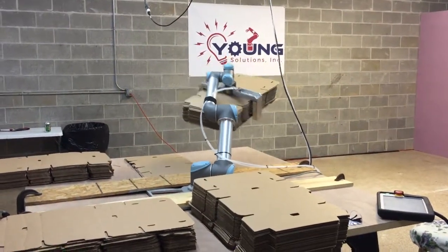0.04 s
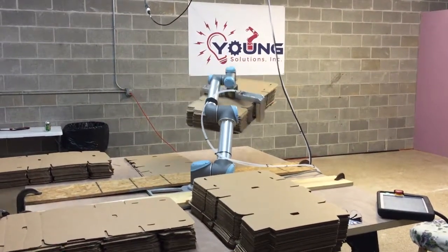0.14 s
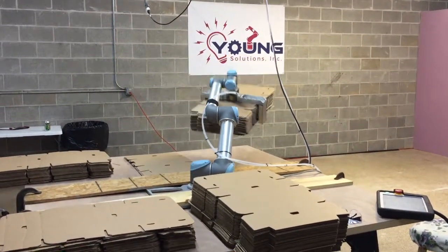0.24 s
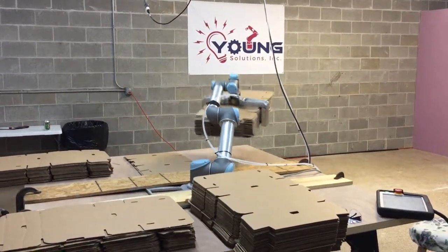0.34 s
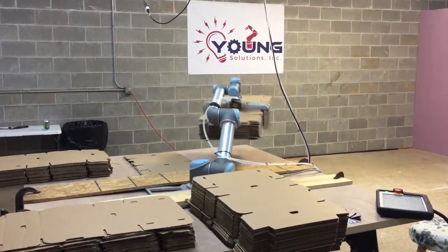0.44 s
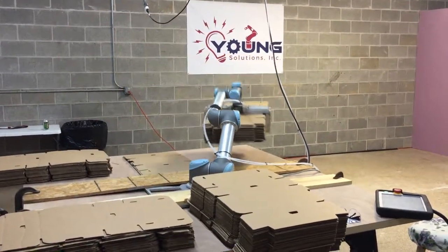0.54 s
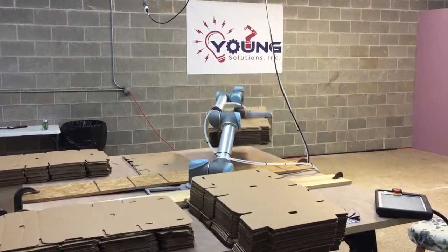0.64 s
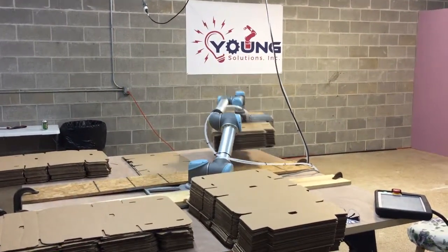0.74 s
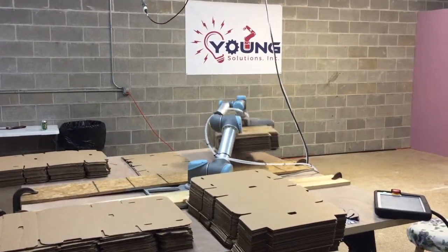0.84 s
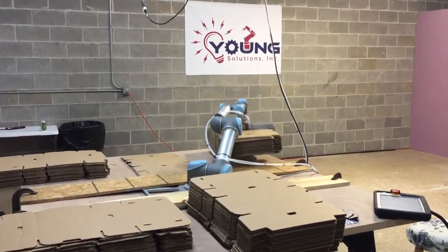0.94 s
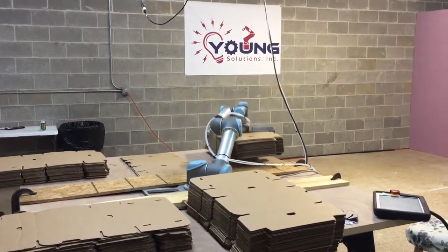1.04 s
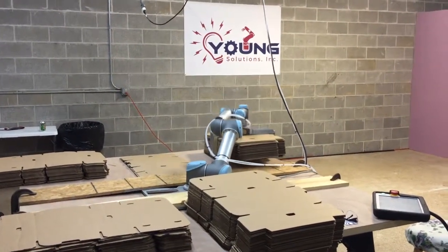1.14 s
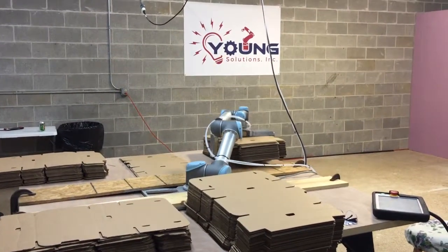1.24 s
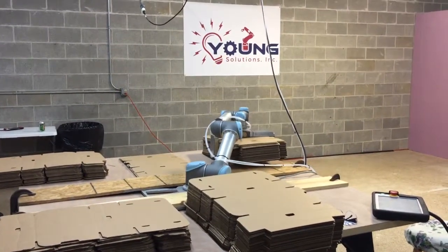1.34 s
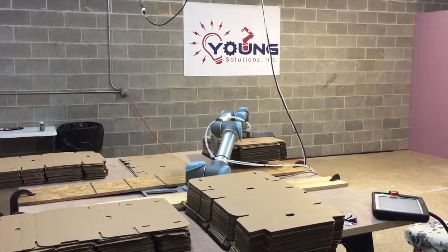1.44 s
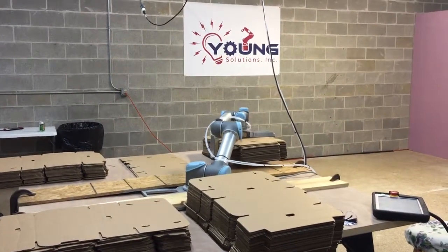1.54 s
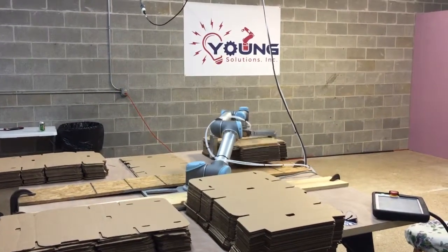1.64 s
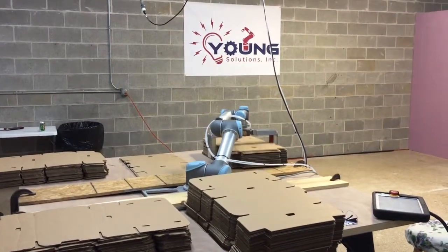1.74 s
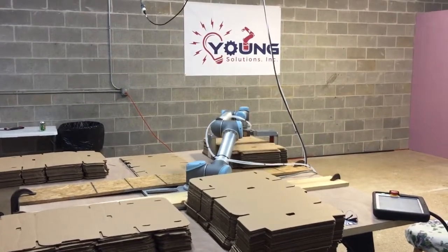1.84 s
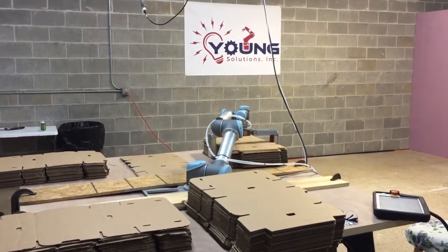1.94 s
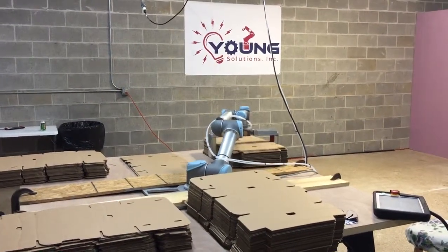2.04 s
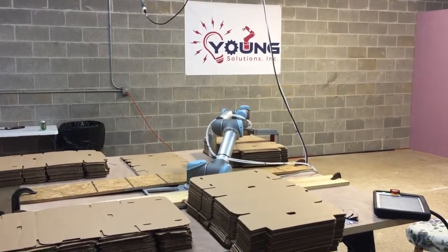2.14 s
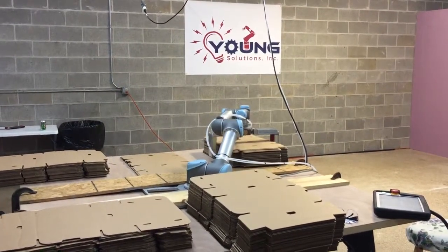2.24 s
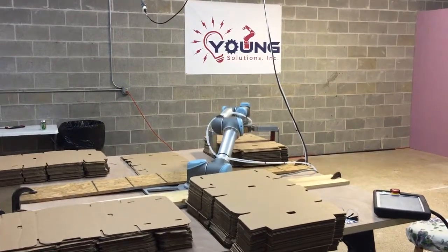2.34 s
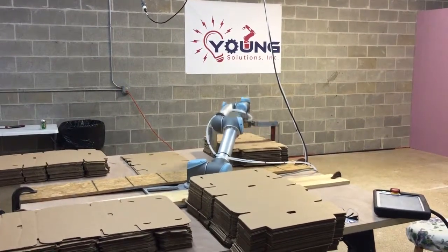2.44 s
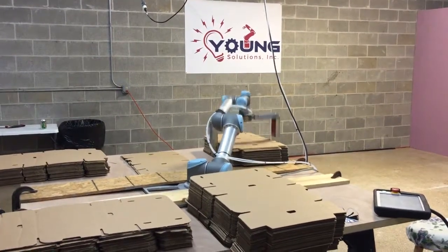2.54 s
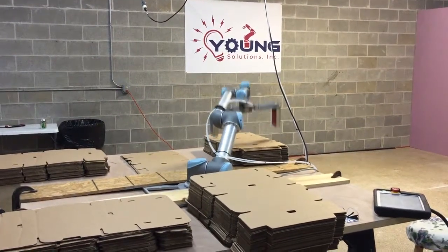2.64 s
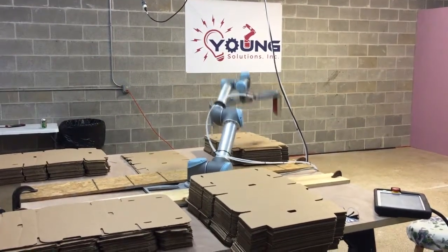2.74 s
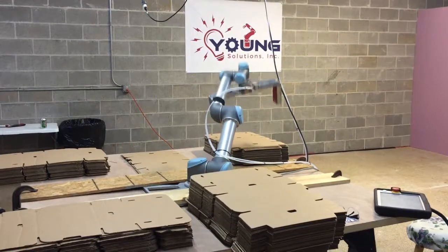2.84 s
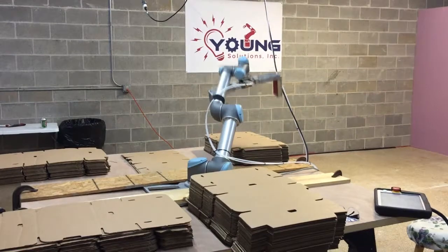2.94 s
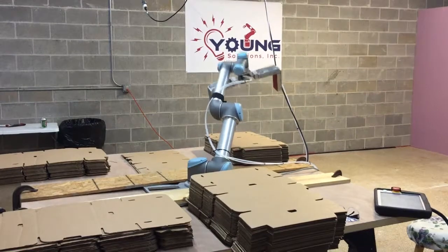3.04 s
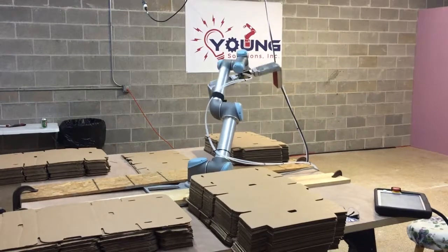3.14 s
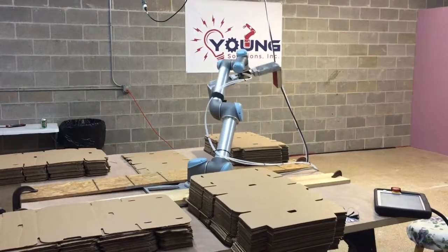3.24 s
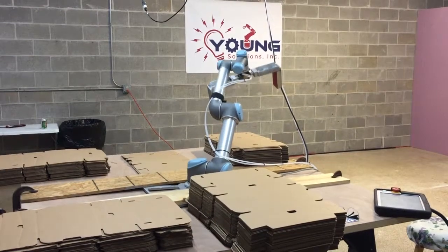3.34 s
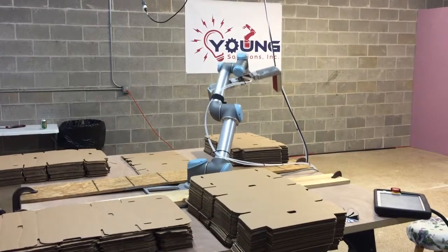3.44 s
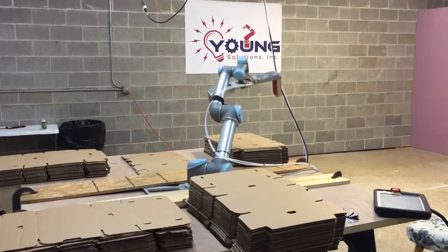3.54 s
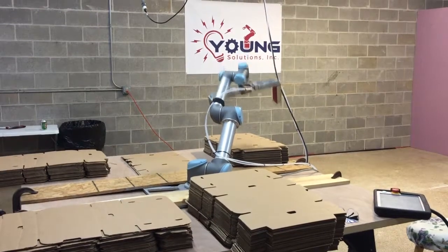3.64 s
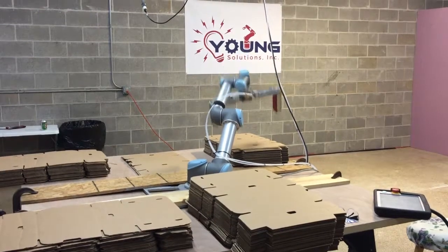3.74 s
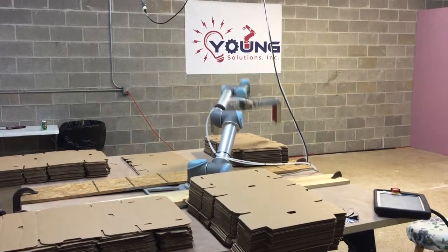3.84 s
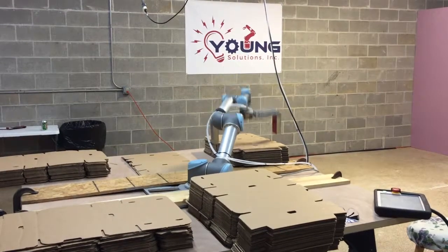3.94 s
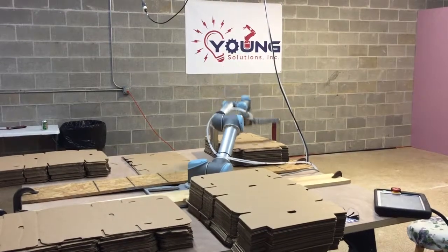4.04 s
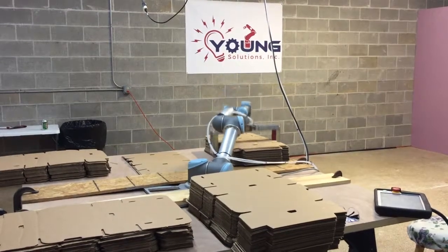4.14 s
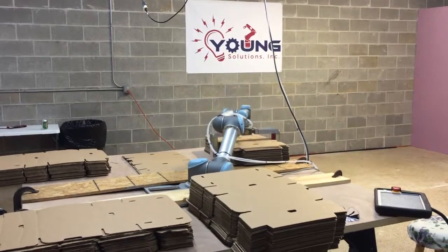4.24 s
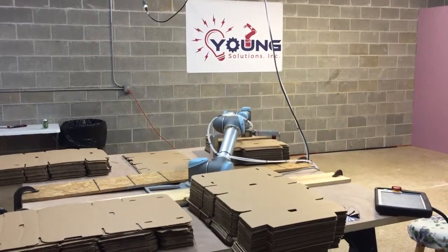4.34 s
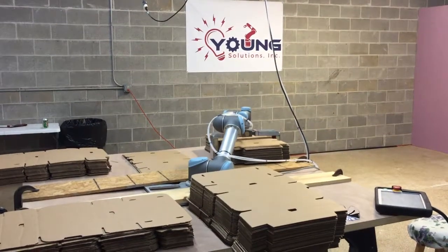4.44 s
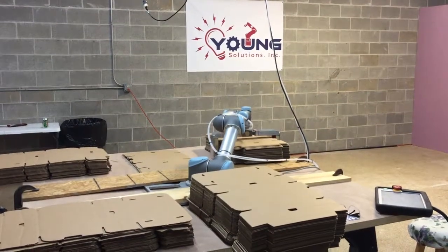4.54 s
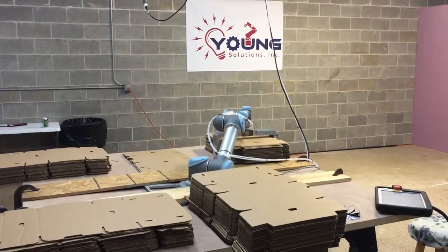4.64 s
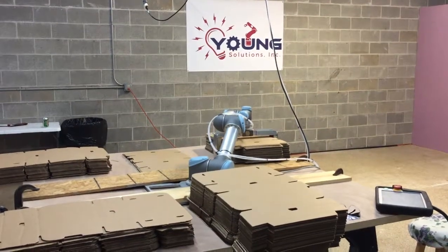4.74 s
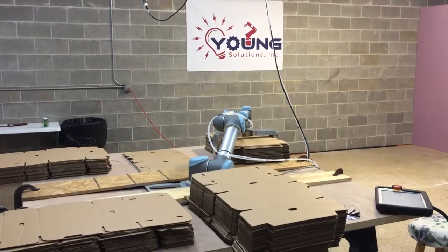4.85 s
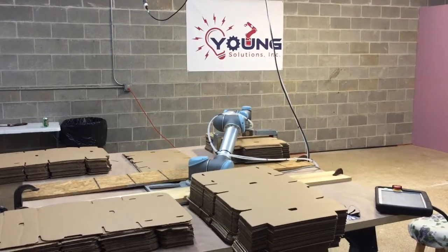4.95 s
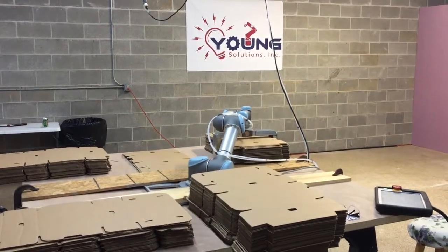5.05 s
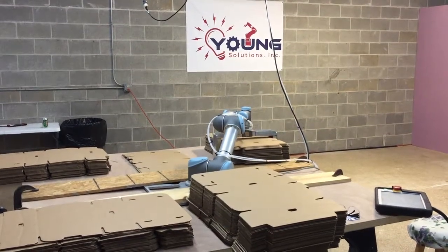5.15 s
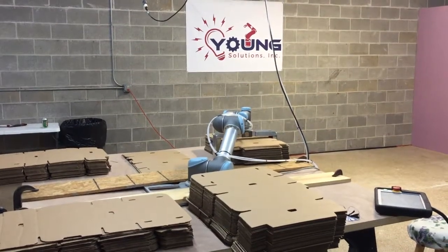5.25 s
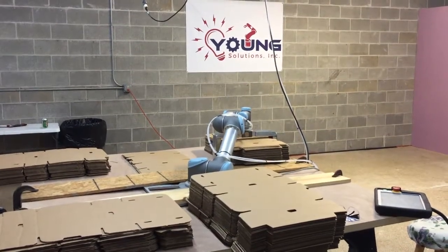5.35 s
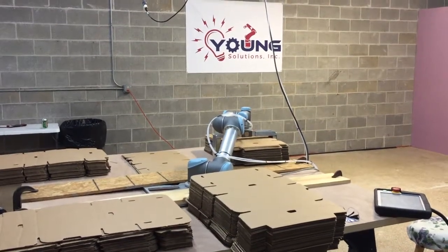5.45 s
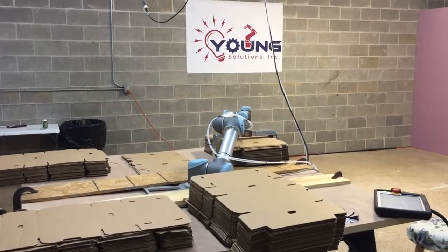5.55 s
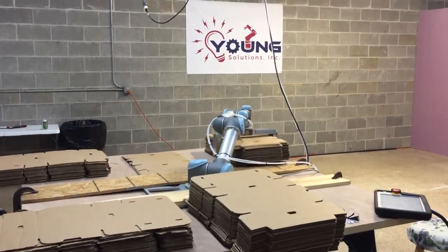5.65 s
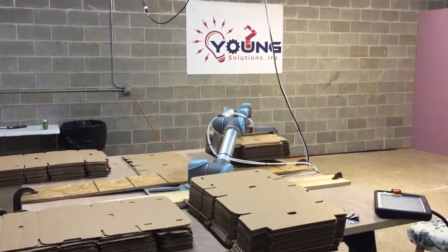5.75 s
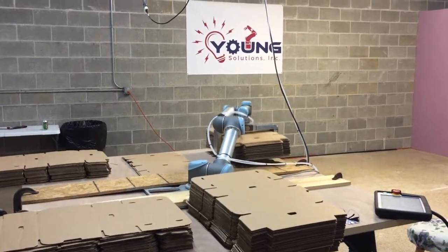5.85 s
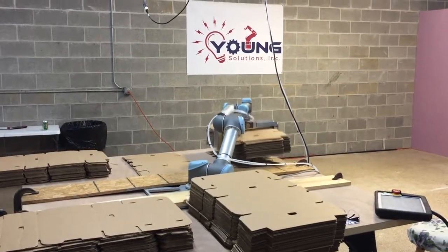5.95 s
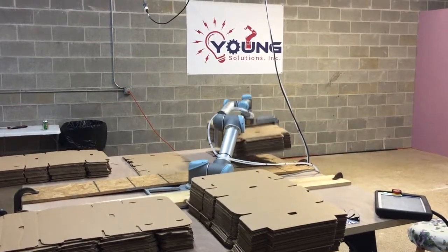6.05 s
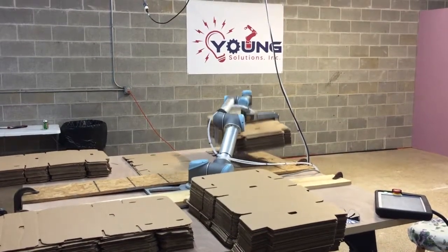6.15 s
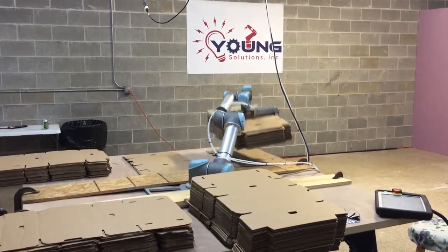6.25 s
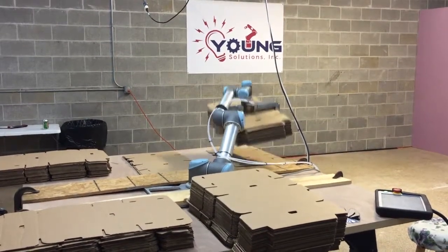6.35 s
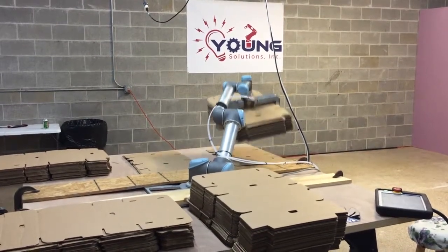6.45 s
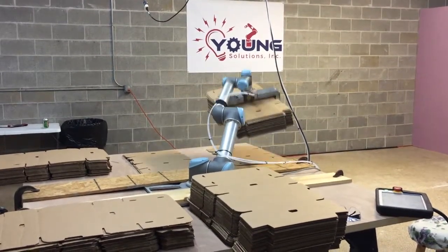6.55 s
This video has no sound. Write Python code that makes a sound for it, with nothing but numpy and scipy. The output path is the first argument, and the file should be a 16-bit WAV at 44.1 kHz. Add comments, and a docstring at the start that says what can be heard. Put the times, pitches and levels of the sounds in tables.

```python
"""One microphone in a block-walled workshop: noise shaped by ducts and fans hums and rushes throughout.
A robot arm's gripper seeps, then vents a pilot and a release blast of noise with a whistle; the hall rings.
The dropped stack of flat cardboard boxes thuds, as enveloped noise. Later the jaw knocks, in noise and
decaying sines, a clamp blast grips the next stack, and it thuds once more under the squeeze.
Last, a thin squeak, a wavering sine, rises and falls as the arm takes the load."""
import sys
import numpy as np
from scipy import signal
from scipy.fft import rfft, irfft, next_fast_len
from scipy.io import wavfile
from scipy.ndimage import map_coordinates

SR = 44100
rng = np.random.default_rng(int(sys.argv[2]) if len(sys.argv) > 2 else 0)


def waveform_to_disk(signal):
    """Save audio, clipped to [-1, 1], as 16-bit WAV at the path in sys.argv[1]."""
    frames = np.transpose(np.atleast_2d(signal))
    scaled = np.clip(frames, -1, 1) * 32767
    samples = np.round(scaled).astype(np.int16)
    wavfile.write(sys.argv[1], SR, samples)


N = 291501  # samples, 6.61 s


def amp(db):
    """Decibels to gain."""
    return 10 ** (np.asarray(db) / 20)


def unit(x):
    """Scale to rms 1."""
    return x / np.sqrt(np.mean(x ** 2) + 1e-20)


def along(points, hz):
    """Read (pitch_hz, value) points at hz, straight lines on a log frequency axis."""
    f, v = np.transpose(points)
    return np.interp(np.log(hz + 1), np.log(f + 1), v)


def since(start_s):
    """Seconds elapsed after start_s, zero before it."""
    return np.maximum(np.arange(N) / SR - start_s, 0)


def wobble(rate):
    """A smooth random curve through rate random knots a second."""
    knots = rng.standard_normal(int(N * rate / SR) + 4)
    return map_coordinates(knots, [np.arange(N) * rate / SR])


def filtered(x, response):
    """Multiply the spectrum of x by a response of frequency."""
    m = next_fast_len(N + SR // 2)  # spare room keeps the end from wrapping onto the start
    hz = np.fft.rfftfreq(m, 1 / SR)
    return irfft(rfft(x, m) * response(hz), m)[:N]


def rush(spectrum, tones=()):
    """Turbulent noise of rms 1: a broad spectrum with narrow resonances, or dips, on it."""
    def response(hz):
        bumps = sum(db / (1 + (2 * (hz - centre) / width) ** 2) for centre, width, db in tones)
        return amp(along(spectrum, hz) + bumps)
    return unit(filtered(rng.standard_normal(N), response))


def strike(start_s, rise_s, t60_s):
    """An envelope that rises in a straight line from start_s, then dies away exponentially."""
    return np.minimum(since(start_s) / rise_s, 1) * amp(-60 * since(start_s + rise_s) / t60_s)


# low rumble in the ducts: pitch_hz, level_db (relative density)
DUCT_RUMBLE = [(20, -49), (30, -34.5), (40, -20.5), (58, -9), (75, -11), (95, -2.5), (120, -6.5),
               (160, -2.5), (200, -6), (250, -6), (370, -16.5), (500, -31), (1100, -63.5)]
# duct resonances on that rumble: pitch_hz, width_hz, boost_db
DUCT_RESONANCES = [(57.6, 7, 4), (91.8, 13, 5.5), (166, 15, 6.5), (245, 7.4, 1.5), (358, 5.1, 4.5)]
# air moving through the room: pitch_hz, level_db (relative density)
AIR_DRAUGHT = [(260, -37), (440, -0.5), (519, -4.5), (639, -1.5), (901, -3.5), (1050, -4), (1430, -4.5),
               (1590, -7), (1840, -8), (2380, -6.5), (3400, -12), (4300, -19.5), (4870, -21.5), (5740, -25),
               (7620, -33.5), (9820, -32.5), (15600, -43.5)]
# fan tones on the draught: pitch_hz, width_hz, boost_db (negative is a dip)
FAN_RESONANCES = [(569, 11, 8.5), (625, 7.3, 8), (1276, 12, 5), (1639, 11, 13), (1850, 6.9, 10.5),
                  (5650, 210, 7.5), (10270, 550, -7.5)]


def ventilation(rumble_db=-38.5, draught_db=-48, flutter_db=0.4):
    """Fan noise drones in the duct resonances under a slightly fluttering rush of air."""
    drone = amp(rumble_db) * rush(DUCT_RUMBLE, DUCT_RESONANCES)
    air = amp(draught_db + flutter_db * wobble(2.2)) * rush(AIR_DRAUGHT, FAN_RESONANCES)
    return drone + air


# hiss of a seal about to open: pitch_hz, level_db (relative density)
SEAL_HISS = [(1500, -24), (5000, -8), (6700, 0), (8500, -9), (11300, -3), (15700, -12)]
SEEP_LEAD_S, SEEP_DB = 0.018, -37


def seep():
    """A thin hiss grows at the seal until the port opens, then fades at twice the blast's decay rate."""
    flow = np.zeros(N)
    for start_s, _, _, emptying_s in PORT_BLASTS:
        flow += strike(start_s - SEEP_LEAD_S, SEEP_LEAD_S, emptying_s) ** 2
    return amp(SEEP_DB) * flow * rush(SEAL_HISS)


# decay of the workshop's tail: pitch_hz, t60_s
HALL_DECAY = [(500, 1.12), (1500, 1.2), (3000, 1.27), (5000, 1.09), (8000, .77), (11000, .52), (15500, .40)]


def diffuse(flow, noise):
    """The hall's tail: energy piles up, swells again as the far wall answers, and drains, treble first."""
    build_s, far_wall_s, smear_s = .006, .38, .12
    hz, t, bands = signal.stft(noise, SR, nperseg=256)
    far_wall = np.exp(-((t - far_wall_s) / smear_s) ** 2)
    arrivals = (1 - np.exp(-t / build_s)) ** 2 * (1 + far_wall)
    decay = arrivals * amp(-60 * t / along(HALL_DECAY, hz)[:, None]) ** 2  # squared: energy
    decay /= decay.sum(axis=1).mean()
    energy = np.interp(t, np.arange(N) / SR, flow ** 2)
    stored = signal.fftconvolve(energy[None], decay, axes=1)[:, :len(t)]
    return signal.istft(bands * np.sqrt(np.abs(stored)), SR, nperseg=256)[1][:N]


def hall(flow, port):
    """A jet of strength flow: heard directly, scattered off the near walls, and as a long tail."""
    tail_db, early_db, wall_delay_s, early_t60_s = -3.1, -7.3, .042, .43
    t = np.arange(SR // 2) / SR
    walls = (amp(-60 * t / early_t60_s) * np.clip(t / wall_delay_s, 0, 1) ** 4) ** 2  # energy
    scattered = signal.fftconvolve(flow ** 2, walls / walls.sum())[:N]
    early = amp(early_db) * np.sqrt(np.abs(scattered))
    near = np.hypot(flow, early) * rush(*port)
    return near + amp(tail_db) * diffuse(flow, rush(*port))


def bounces(x, strength=0.1, spread_s=.011, count=8):
    """Quick reflections off the arm, bench and stacks put a fine ripple on the spectrum."""
    delays = spread_s * rng.uniform(.05, 1, count)
    copies = sum(np.pad(x, (round(d * SR), 0))[:N] for d in delays)
    return (x + strength * copies) / np.sqrt(1 + count * strength ** 2)


# air vented by the pilot, release and clamp ports in turn:
# start_s, level_db (of the direct jet, before reflections), opening_s, emptying_t60_s
PORT_BLASTS = [(1.563, -23, .005, 0.21), (1.640, -9.5, .017, 0.27), (4.5584, -9, 0.0062, .25)]
# broad hiss of each port: pitch_hz, level_db (relative density)
PILOT_HISS = [(500, -43.5), (900, -21.5), (1400, -15), (2050, -11.5), (2950, -6), (4100, -6.5),
              (5200, -5.5), (7300, -3.5), (9000, -1.5), (10800, 1), (12500, -3), (15700, -10)]
RELEASE_HISS = [(150, -43.5), (350, -22.5), (620, -16.5), (850, -13.5), (1370, -4), (2060, -2), (2950, -1),
                (4050, 0.35), (5100, -4.5), (7300, -6.5), (9000, -7.5), (10800, -8.5), (15600, -12.5)]
CLAMP_HISS = [(120, -40), (400, -10.5), (880, -7.5), (1370, -3), (2060, -3), (2950, 0.3), (4050, 1),
              (5100, -2.5), (6100, 0), (7300, -6), (9000, -5), (10800, -9), (12500, -4.5), (15600, -13)]
# narrow resonances of each port: pitch_hz, width_hz, boost_db
PILOT_RESONANCES = [(9400, 400, 2), (11200, 220, 2)]
RELEASE_RESONANCES = [(3150, 300, 1.5), (6160, 660, 4.64), (9800, 350, 2.4)]
CLAMP_RESONANCES = [(2290, 160, 2), (5600, 450, 2), (8520, 720, 1.4)]
FULL_FLOW_S = 0.011  # a port blows at full pressure this long


def valve():
    """A port opens, blows at full pressure, then fades as the line empties."""
    ports = [(PILOT_HISS, PILOT_RESONANCES), (RELEASE_HISS, RELEASE_RESONANCES),
             (CLAMP_HISS, CLAMP_RESONANCES)]
    air = np.zeros(N)
    for (start_s, level_db, opening_s, emptying_s), port in zip(PORT_BLASTS, ports):
        opened = np.minimum(since(start_s) / opening_s, 1) ** 2
        fade_db = -60 * since(start_s + opening_s + FULL_FLOW_S) / emptying_s
        air += bounces(hall(opened * amp(level_db + fade_db), port))
    return air


WHISTLE_LAG_S, WHISTLE_RISE_S, WHISTLE_T60_S = .01, .009, .25  # lag after the pilot port starts to open
WHISTLE_DB = -25.5


def whistle(centre_hz=6170, width_hz=380):
    """A breathy edge tone of the pilot port: a narrow band of noise that rises fast and dies away."""
    tone = filtered(rng.standard_normal(N), lambda hz: 1 / (1 + (2 * (hz - centre_hz) / width_hz) ** 4))
    swell = strike(PORT_BLASTS[0][0] + WHISTLE_LAG_S, WHISTLE_RISE_S, WHISTLE_T60_S)
    return amp(WHISTLE_DB) * swell * unit(tone)


# the stack lands, settles or is squeezed: start_s, level_db (of the bulk)
STACK_THUDS = [(1.790, -30.5), (1.824, -28), (1.92, -31.5), (2.014, -37.5), (4.789, -37)]
# dull bulk of the stack: pitch_hz, level_db (relative density)
STACK_BULK = [(20, -52.5), (35, -23), (55, -0.5), (90, 0.5), (190, -10.5), (300, -12), (600, -23.5),
              (1500, -57.5), (5000, -110)]
# slap of its loose top sheets: pitch_hz, level_db (relative density)
SHEET_SLAP = [(90, -31.5), (190, -1), (370, -5.5), (520, -13.5), (700, -11), (1500, -33.5), (5000, -61.5),
              (12000, -110)]
THUD_RISE_S, THUD_T60_S, THUD_SLAP_DB = .016, .4, -4.5  # slap level is against the bulk


def cardboard():
    """Each thud is a dull push of the whole stack with a slap of loose sheets."""
    energy = sum((amp(db) * strike(s, THUD_RISE_S, THUD_T60_S)) ** 2 for s, db in STACK_THUDS)
    return np.sqrt(energy) * (rush(STACK_BULK) + amp(THUD_SLAP_DB) * rush(SHEET_SLAP))


# the jaw strikes the stack: start_s, ring_db (0 dB mode), slap_db, slap_t60_s (sheets and bulk)
JAW_KNOCKS = [(4.468, -24.5, -33, .9), (4.564, -31, -26.5, 0.3), (4.621, -30, -39, .2)]
# modes of the gripper on its arm: pitch_hz, level_db (against ring_db), t60_s
GRIPPER_MODES = [(184.2, 0, 0.42), (275, -2, .15), (363, -4.5, 0.51), (515, -6.5, 0.16)]
KNOCK_RISE_S, KNOCK_BULK_DB = .005, -37  # every knock: contact time, push of the whole stack


def jaw():
    """Each knock slaps the top sheets, pushes the stack and sets the gripper ringing low."""
    sheets, bulk, out = rush(SHEET_SLAP), rush(STACK_BULK), np.zeros(N)
    for start_s, ring_db, slap_db, slap_t60_s in JAW_KNOCKS:
        slap = amp(slap_db) * sheets + amp(KNOCK_BULK_DB) * bulk
        out += strike(start_s, KNOCK_RISE_S, slap_t60_s) * slap
        for pitch_hz, level_db, t60_s in GRIPPER_MODES:
            ring = np.sin(2 * np.pi * (pitch_hz * since(start_s) + rng.random()))
            out += amp(ring_db + level_db) * strike(start_s, KNOCK_RISE_S, t60_s) * ring
    return out


# strain on the grip swells and eases once
STRAIN_PEAK_S, STRAIN_BUILD_S, STRAIN_EASE_S = 5.635, .08, .1
SQUEAK_SLACK_HZ, SQUEAK_RISE_HZ = 8650, 1560  # pitch without strain, and what full strain adds
SQUEAK_START_S, SQUEAK_SWELL_S, SQUEAK_RELEASE_S, SQUEAK_DB = 5.39, .31, .085, -70.5


def squeak(waver=0.007, flutter_db=3):
    """A thin unsteady whistle whose pitch rises and falls with the strain as the grip takes the weight."""
    t = np.arange(N) / SR - STRAIN_PEAK_S
    strain = np.exp(-np.abs(t / np.where(t < 0, STRAIN_BUILD_S, STRAIN_EASE_S)) ** 2.6)
    pitch_hz = (SQUEAK_SLACK_HZ + SQUEAK_RISE_HZ * strain) * (1 + waver * wobble(500))
    swell = np.minimum(since(SQUEAK_START_S) / SQUEAK_SWELL_S, 1)
    release = np.maximum(1 - since(SQUEAK_START_S + SQUEAK_SWELL_S) / SQUEAK_RELEASE_S, 0)
    tone = amp(flutter_db * wobble(90)) * np.sin(2 * np.pi * np.cumsum(pitch_hz) / SR)
    return amp(SQUEAK_DB) * swell * release * unit(tone)


def scene():
    """Everything as it arrives at one microphone."""
    gripper = valve() + seep() + whistle() + jaw() + squeak()
    return (gripper + cardboard() + ventilation())[None]


TOP_HZ = 15800  # the recorder's band limit


def record(dry, ceiling=0.97):
    """The recorder rounds off the highest peaks, then cuts steeply above its band limit."""
    rounded = dry[0] / (1 + np.abs(dry[0] / ceiling) ** 8) ** (1 / 8)
    return filtered(rounded, lambda hz: 1 / np.sqrt(1 + (hz / TOP_HZ) ** 400))[None]


dry = scene()
out = record(dry)
waveform_to_disk(out)
```